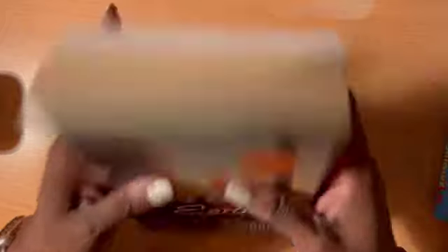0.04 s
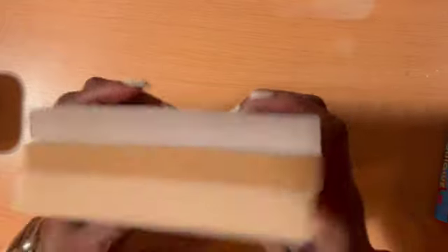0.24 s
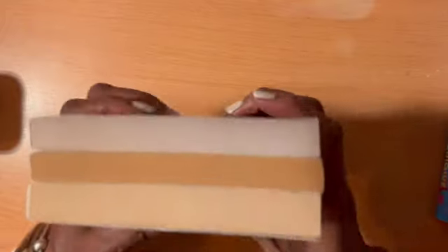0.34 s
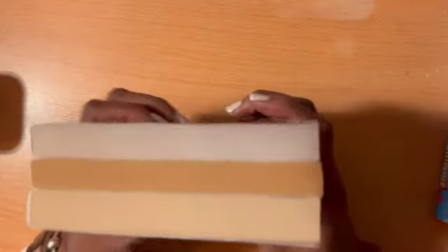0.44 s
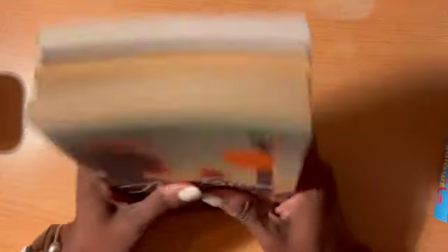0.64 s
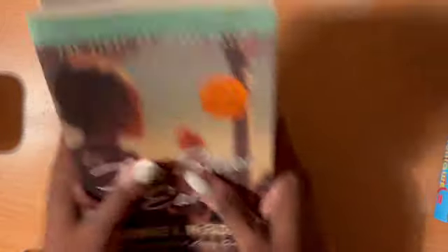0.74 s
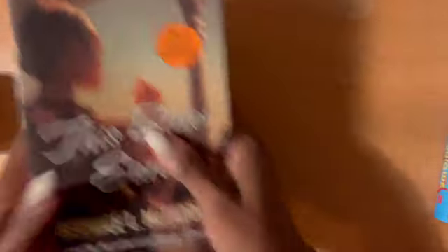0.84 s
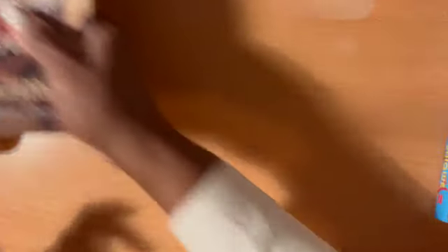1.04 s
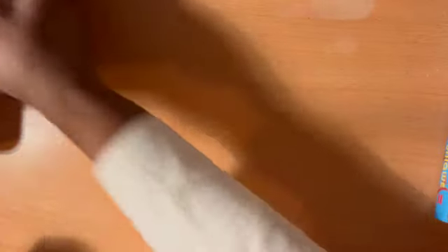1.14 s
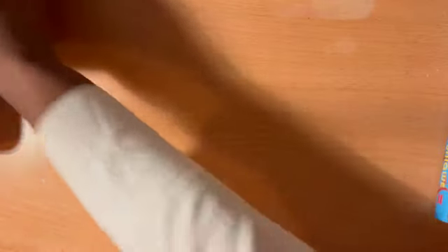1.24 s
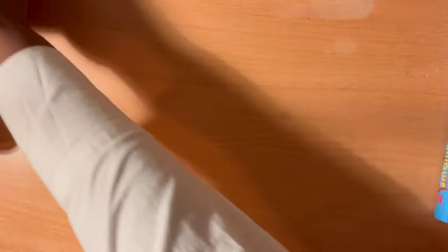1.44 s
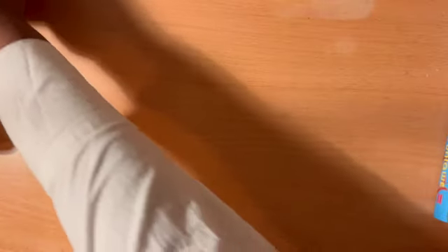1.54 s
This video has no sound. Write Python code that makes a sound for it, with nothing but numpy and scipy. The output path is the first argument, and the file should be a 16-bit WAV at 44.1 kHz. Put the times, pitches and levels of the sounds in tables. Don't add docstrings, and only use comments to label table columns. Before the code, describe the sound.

Paperback books are handled on a wooden table, heard close in a quiet room. Soft brushing and tiny taps come first; at about 0.24 seconds the stack knocks hard, a dense woody clatter lasting under a tenth of a second. Stiff covers crackle from 0.42 to 0.6, with a light thump near 0.57. Faint rubbing follows, a soft tap at 1.17, then sleeve rustle and dull touches around 1.5.

```python
import sys
import numpy as np
from scipy import signal
from scipy.fft import rfft, irfft
from scipy.io import wavfile
from scipy.ndimage import uniform_filter1d

SR = 44100
rng = np.random.default_rng(int(sys.argv[2]) if len(sys.argv) > 2 else 0)


def persist_wave(psi):
    counts = np.round(np.clip(psi, -1, 1) * 32767).astype(np.int16)
    wavfile.write(sys.argv[1], SR, np.atleast_2d(counts).T)


def volts_from_db(level):
    exponent = np.asarray(level, float) / 20
    return 10 ** exponent


N = 70560
TIME_S = np.arange(N) / SR
BIN_HZ = np.fft.rfftfreq(2 * N, 1 / SR)


def unit(x):
    return x / np.sqrt(np.mean(x ** 2))


def noise():
    return rng.standard_normal(N)


def along(points, column):
    points = np.array(points, float)
    return np.interp(np.log(BIN_HZ + 1), np.log(points[:, 0]), points[:, column])


def shape(x, gain):
    return irfft(rfft(x, 2 * N) * gain)[..., :N]


def band(hz, width_hz):
    f = BIN_HZ + 1e-3
    return 1 / (1 + 1j * (f / hz - hz / f) * hz / width_hz)


def walk(rate_hz):
    hold = int(SR / rate_hz)
    levels = rng.standard_normal(N // hold + 1)
    return uniform_filter1d(np.repeat(levels, hold), hold)[:N]


def curve(rows):
    rows = np.array(rows)
    return volts_from_db(np.interp(TIME_S, rows[:, 0], rows[:, 1]))


def air():
    # (frequency [Hz], density [dB per Hz])
    air_colour = [(30, -7.5), (300, -13.5), (750, -9), (1900, -6.5), (3500, -18), (8000, -26.5),
                  (12000, -24.5), (16000, -13.5)]
    level_db = -63.5
    mid, side = shape(rng.standard_normal((2, N)), volts_from_db(along(air_colour, 1)))
    side = shape(side, 1 - band(0.933, 500))
    return volts_from_db(level_db) * unit(np.array([mid + side, mid - side]))


def stroking():
    # (time [s], level [dB])
    stroke_level = [(0.0, -53.5), (0.088, -55.5), (0.19, -76), (0.226, -64.5), (0.236, -52), (0.342, -91),
                    (0.378, -69), (0.418, -53.5), (0.498, -48.5), (0.664, -63.5), (0.815, -59.5),
                    (0.85, -52), (0.965, -54.5), (0.998, -67), (1.09, -66), (1.122, -59), (1.18, -70),
                    (1.6, -76)]
    # (frequency [Hz], density [dB per Hz])
    stroke_colour = [(300, -2), (1000, -9.5), (3000, -10), (6000, -10), (8000, -8.5), (12000, -1),
                     (16000, -6.5)]
    catches = noise() * volts_from_db(2.8 * walk(300))
    hiss = unit(shape(catches, volts_from_db(along(stroke_colour, 1))))
    return hiss * curve(stroke_level) * volts_from_db(2.0 + 1.1 * walk(44))


def scuffs():
    # (start [s], length [s], level [dB], centre [Hz], width [Hz])
    rubs = [(0, 0.13, -68.5, 2758, 600), (0.24, 0.077, -32.5, 820, 270), (0.408, 0.13, -57, 2930, 7400),
            (0.46, 0.11, -46.5, 1660, 3800), (0.557, 0.089, -51.5, 1430, 3007),
            (0.69, 0.042, -64.5, 2690, 1340), (.852, .03, -67, 3600, 1500), (.955, .02, -60, 7700, 920),
            (.77, .025, -70, 8200, 2350), (.95, 0.4, -67.5, 1102, 2470), (1.102, 0.0654, -60, 2100, 1620),
            (1.269, 0.0072, -64, 4500, 2000), (1.48, 0.053, -57.5, 1260, 1060), (.238, .03, -31, 1250, 730),
            (.264, .03, -34, 1300, 704), (0.019, 0.12, -60, 330, 290), (1.108, 0.044, -63, 6300, 4500),
            (1.4, .15, -54, 16000, 3000), (.04, .05, -67.5, 2950, 250), (0.2, 0.042, -66, 2400, 250),
            (1.457, 0.051, -56.5, 290, 460), (1.458, 0.045, -74.5, 5100, 2540)]
    rise_s, fade_share = 0.0066, 0.41
    out = np.zeros(N)
    for start_s, length_s, db, hz, width_hz in rubs:
        rise = np.clip((TIME_S - start_s) / rise_s, 0, 1)
        fade = np.clip((start_s + length_s - TIME_S) / (fade_share * length_s), 0, 1)
        rub = unit(shape(noise(), band(hz, width_hz) ** 3))
        out += volts_from_db(db + 1.8 * walk(150)) * rise * fade * rub
    return out


def handling():
    # (time [s], level [dB])
    handling_level = [(0, -56), (.1, -65), (.16, -63), (.3, -78), (.4, -49.5), (.45, -53.5), (.5, -46),
                      (.68, -56.5), (.8, -59.5), (.9, -59.5), (1.05, -64.5), (1.15, -67), (1.22, -62),
                      (1.35, -84.5), (1.5, -59.5), (1.6, -74)]
    rumble_walk_db = 2.0
    low = np.zeros(N)
    for hz, db in ((52.7, -3.5), (104.5, 1), (230, -3)):
        rumble = unit(shape(noise(), band(hz, 0.62 * hz) ** 2))
        low += volts_from_db(db + rumble_walk_db * walk(30)) * rumble
    return unit(low) * curve(handling_level)


def covers():
    # (time [s], level [dB], decay [ms], extra treble [dB])
    cracks = [(.0005, -43.5, 3.3, -2.5), (.074, -61, 7.7, -0.5), (0.091, -56.5, 9, 0.5),
              (.4188, -40, 2.5, 6), (0.4263, -42.5, 3, 8.5), (.445, -54.5, 2, -0.5), (0.45, -52.5, 2, 0.5),
              (0.48, -48.5, 4, 0), (0.486, -30.5, 2.5, 2), (0.4955, -42, 3, -4.5),
              (0.5063, -30.5, 2.2, 4.5), (.515, -31, 2, -3), (.5235, -39.5, 2, 2), (0.5256, -31, 2.2, -5.5),
              (0.532, -30.5, 2.5, -9), (0.5358, -33, 2.5, -8.5), (.541, -38.5, 2.5, -1),
              (0.5469, -38.5, 2.2, 9.5), (0.551, -36.5, 2, -6), (.559, -37, 2, -3.5),
              (0.564, -54.5, 2, 4.5), (.5738, -39.5, 2, -1.5), (0.596, -56, 3, 2), (0.611, -58.5, 6, 8),
              (.63, -52.5, 12, 3.5)]
    # (frequency [Hz], width [Hz], level [dB])
    card_modes = [(600, 640, 2), (1300, 1000, -0.5), (2100, 220, 5.5), (3150, 1100, -5), (5186, 310, -5),
                  (7060, 690, -14.5), (12421, 4500, -20.5)]
    split_hz, rise_s, tick_delay_s, tick_gain = 4000, 0.00037, 4e-4, 5.1
    grit = noise() * volts_from_db(0.8 * walk(1500))
    out = np.zeros(N)
    for bright in (0, 1):
        slips = np.zeros(N)
        for start_s, db, decay_ms, treble_db in cracks:
            age_s = TIME_S - start_s
            burst = np.clip(age_s / rise_s, 0, 1) * np.exp(-np.abs(age_s) * 1000 / decay_ms)
            tick = np.sinc((age_s - tick_delay_s) * SR)
            slips += volts_from_db(db + bright * treble_db) * (burst * grit + tick_gain * tick)
        card = 0
        for k, (hz, width_hz, db) in enumerate(card_modes):
            if (hz > split_hz) == bright:
                card = card + (-1) ** k * volts_from_db(db) * band(hz, width_hz)
        out += shape(slips, card)
    return out * 3.5


def taps():
    # (time [s], level [dB], pitch [Hz], t60 [s])
    touches = [(.06, -48.5, 197, 0.12), (.087, -43.5, 205, 0.035), (.128, -33, 267.3, 0.009),
               (0.213, -44.5, 755, 0.057), (.221, -32.5, 857, 0.032), (.2368, 2, 640, 0.017),
               (.2635, -12, 517, .03), (0.2886, -19, 480, 0.011), (.129, -48, 800, 0.012),
               (.2452, -10, 400, 0.044), (.276, -18, 357, 0.034), (0.5622, -21.5, 387, 0.043),
               (0.5658, -27.5, 100, 0.25), (.5713, -21, 341, 0.031), (.576, -28.5, 133, 0.074),
               (0.5882, -33, 268, 0.054), (.727, -50, 236.2, 0.03), (.92, -55.5, 219, 0.0167),
               (1.006, -55.5, 224.4, 0.14), (1.053, -55, 230, 0.031), (1.168, -42, 238, 0.061),
               (1.454, -60, 1133, .06), (1.456, -59, 556, 0.068), (1.474, -45, 279, 0.059),
               (1.5, -39, 190, 0.034), (1.511, -48, 140, 0.065), (1.541, -54, 140, 0.093)]
    glide_share, glide_s, touch_s = 0.4, 0.002, 0.0012
    out = np.zeros(N)
    for start_s, db, hz, t60_s in touches:
        age_s = np.clip(TIME_S - start_s, 0, 1)
        turns = hz * (age_s + glide_share * glide_s * (1 - np.exp(-age_s / glide_s)))
        attack = np.sin(np.pi / 2 * np.clip(age_s / touch_s, 0, 1)) ** 2
        out += volts_from_db(db - 60 * age_s / t60_s) * attack * np.sin(2 * np.pi * turns)
    return out


def table_blows():
    # (time [s], level [dB], contact [ms], ring share [0-1], paper slap [dB])
    blows = [(.238, -11, 2.3, 0.66, -34), (0.2454, -19.5, 2, 0.6, -38), (0.2604, -10, 2, 0.21, -44.5),
             (.2645, -12.5, 1.9, 0.2, -45.5), (.2685, -14, 1.6, .2, -44), (.274, -21.5, 2, 0.1, -54.5),
             (.281, -14.5, 2.015, 0.61, -56.5), (.2875, -22, 1.7, 0.46, -56.5), (.299, -32, 3.4, 0, -65.5),
             (.307, -35, 1.46, 0.1, -65), (.559, -37, 1.15, 0.36, -62), (.573, -42, 1.5, 0.34, -53.5)]
    # (frequency [Hz], level [dB], time to fall about 107 dB [s])
    wood_modes = [(67, -11, 0.26), (100.8, 1.5, 0.26), (140, -10, 0.051), (224.4, -9.5, 0.27),
                  (272, -7, 0.23), (350, -2.5, 0.18), (477, -7.5, 0.034), (493.6, -5.5, 0.033),
                  (550, -13.5, 0.052), (691.4, -12.5, 0.082), (890, -21.5, 0.13), (1152, -3.5, 0.11),
                  (1460, -21, .08), (1970, -24.5, .07)]
    bending_s = 0.085
    early_s, direct_db = 0.0033, 2
    slap_db, snap_s, slap_s, slap_lead_s = 9, 0.0025, 0.025, 0.0034

    push, ring, slap = np.zeros((3, N))
    for start_s, db, contact_ms, ring_share, paper_db in blows:
        spread_s = contact_ms * 0.00012
        bump = np.exp(-0.5 * ((TIME_S - start_s) / spread_s) ** 2)
        bump *= volts_from_db(db) / (contact_ms * 0.028)
        push += bump
        ring += ring_share * bump
        age_s = TIME_S - start_s + slap_lead_s
        decay = np.exp(-np.abs(age_s) / snap_s) + 0.24 * np.exp(-np.abs(age_s) / slap_s)
        slap += volts_from_db(paper_db) * (age_s > 0) * decay

    modes = 0
    for k, (hz, db, t60_s) in enumerate(wood_modes):
        modes = modes + (-1) ** k * volts_from_db(db) * band(hz, 3.91 / t60_s)
    bending = np.exp(-2j * np.pi * (2 * bending_s * np.sqrt(BIN_HZ + 30) - early_s * BIN_HZ))
    ringing = shape(ring, bending * modes * 1.459)
    direct = shape(push, bending * band(570, 530) * volts_from_db(direct_db) * 0.11)
    paper = shape(noise(), band(1600, 1600) + 0.03 * band(8000, 12000))
    return ringing + direct + volts_from_db(slap_db) * slap * paper


def echo(t60_s, db):
    spray = rng.standard_normal((2, N)) * (TIME_S > 0.001) * volts_from_db(-60 * TIME_S / t60_s)
    spray = shape(spray, 1 - band(0.77, 480))
    energy = np.sum(spray ** 2, axis=1, keepdims=True)
    return volts_from_db(db) * rfft(spray / np.sqrt(energy), 2 * N)


def scene():
    # (frequency [Hz], left lead [radians], left minus right [dB])
    port_points = [(100, 0.6, 0), (600, 0.18, -1), (920, -1.66, -2), (1963, 0.71, -1.5), (3500, -1.4, -2),
                   (5000, -0.83, -12), (8640, .8, 0.2), (13420, 1, 1.05)]
    half = volts_from_db(along(port_points, 2) / 2) * np.exp(0.5j * along(port_points, 1))
    rubbing = stroking() + scuffs() + handling()
    out = air()
    for source, pan_db in ((rubbing, -0.6), (covers(), -1.5), (taps() + table_blows(), 0.6)):
        left = half * volts_from_db(pan_db)
        ports = np.array([left, 1 / left])
        nearby = echo(t60_s=0.029, db=-4.5)
        room = echo(t60_s=0.25, db=-7.5)
        out = out + shape(source, ports + nearby + room)
    return out


def low_pass(x):
    return signal.sosfilt(signal.butter(12, 16010, fs=SR, output="sos"), x)


def record(dry):
    # (start [s], end [s], low edge [Hz], high edge [Hz])
    dead_bands = [(-.1, .05, 9600, 10300), (0, .232, 8950, 9650), (.11, .232, 9550, 10300),
                  (.245, .412, 8900, 10300), (.44, .578, 8900, 10350), (.603, 1.435, 8950, 10250),
                  (-.1, .232, 13600, 15000), (.243, .395, 13300, 15100), (.243, .33, 15000, 16100),
                  (.44, .578, 13600, 15000), (.505, .578, 14900, 16100), (.603, 1.2, 13600, 14950),
                  (.603, .655, 14850, 16100), (1.29, 1.435, 13600, 14900)]
    switch_s, edge_hz, top_hz = 0.012, 60, 15830
    for start_s, end_s, low_hz, high_hz in dead_bands:
        gone = np.clip(np.minimum(TIME_S - start_s, end_s - TIME_S) / switch_s, 0, 1)
        inside = np.clip(np.minimum(BIN_HZ - low_hz, high_hz - BIN_HZ) / edge_hz, 0, 1)
        dry = dry - gone * shape(dry, inside)
    mix = shape(dry, BIN_HZ < top_hz)
    return low_pass(mix)


dry = scene()
out = record(dry)
persist_wave(out)
```